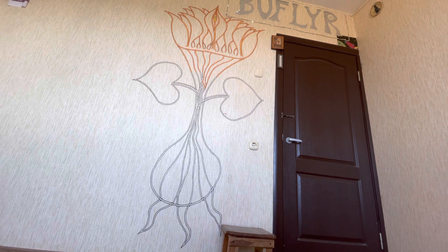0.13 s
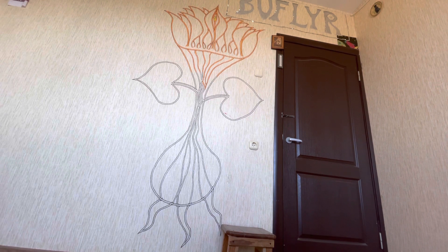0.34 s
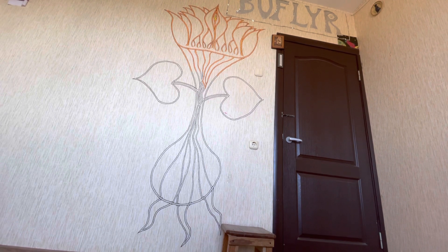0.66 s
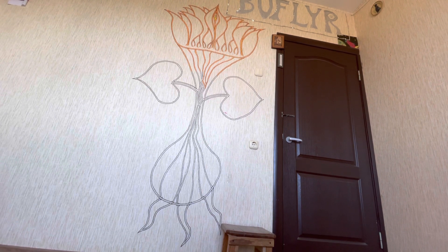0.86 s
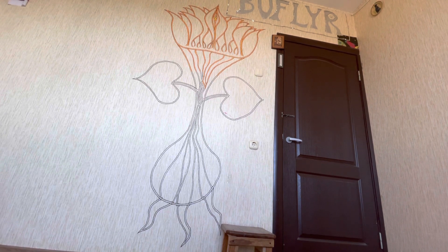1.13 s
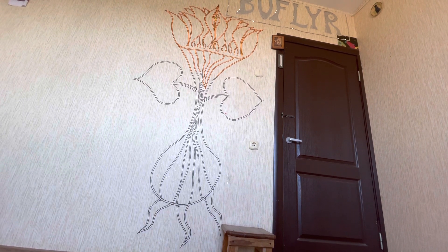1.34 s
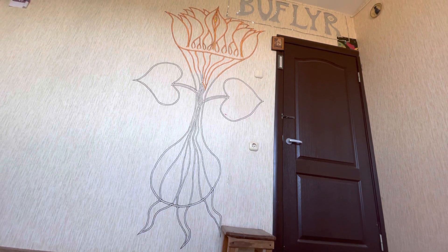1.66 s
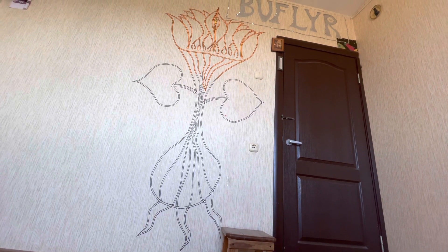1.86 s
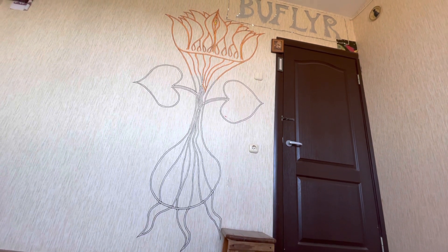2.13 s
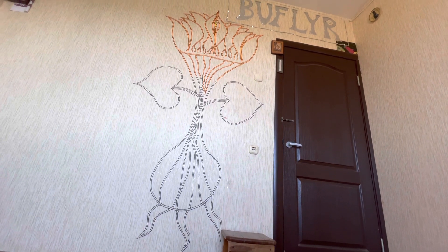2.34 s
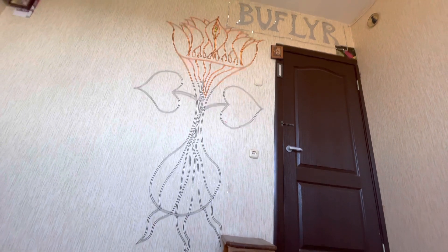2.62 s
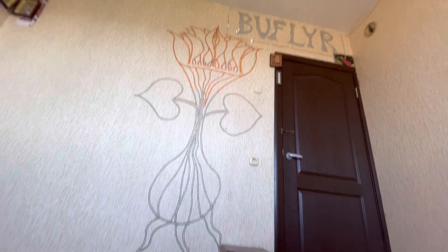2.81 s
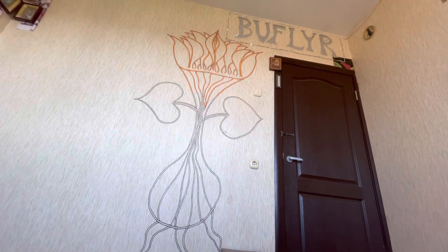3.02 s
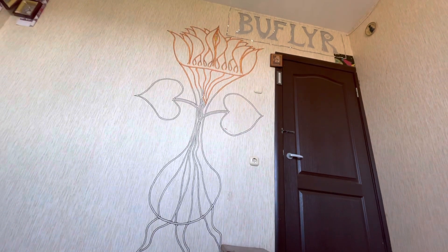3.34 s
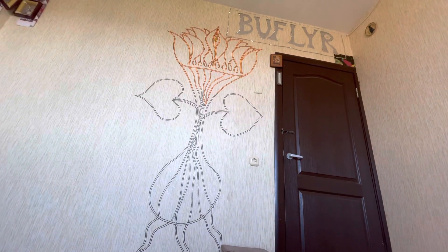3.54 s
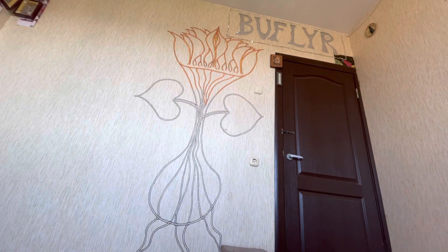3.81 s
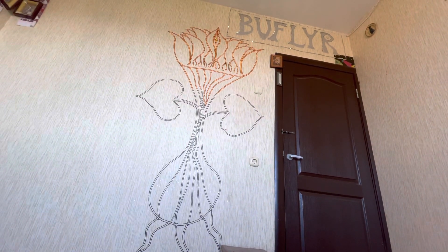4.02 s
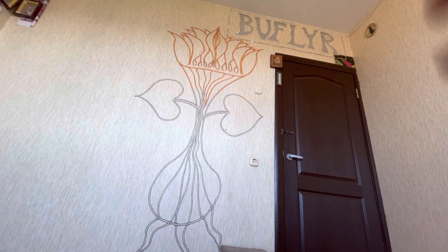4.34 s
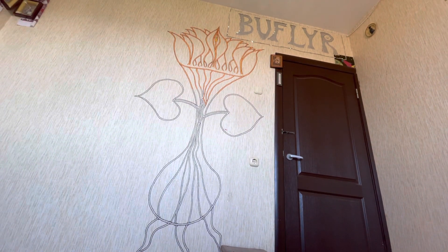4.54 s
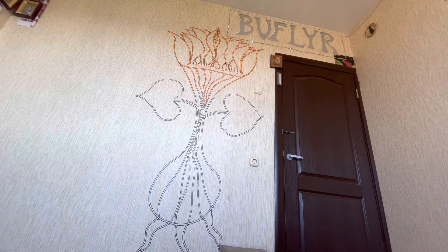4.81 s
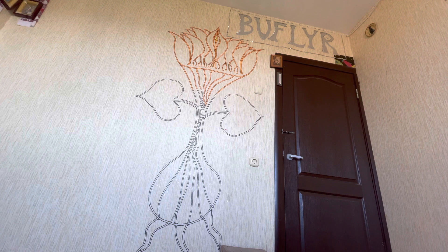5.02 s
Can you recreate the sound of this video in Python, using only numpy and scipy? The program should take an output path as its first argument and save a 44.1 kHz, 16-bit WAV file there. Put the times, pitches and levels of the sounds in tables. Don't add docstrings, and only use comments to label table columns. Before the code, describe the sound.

A quiet stereo phone capture of morning birds heard from a room. From 0 to 1 second, distant birds twitter in short level notes and quick falling chirps around 2.5-4 kHz, with a dense swell near 0.95. From 1.03 to 1.5 seconds a near bird shakes a fast, piercing trill around 8 kHz. A rough two-voiced buzz follows at 1.57-1.68, then throbbing, bent chirps near 3-5 kHz until 2.1, with other birds crowding behind around 1.75. Clear whistles fall at 2.24 and dip at 2.32-2.45, trailing faintly to 2.6. Afterward it is sparse: soft far glides, a thin high peep at 2.65-3.1, a cascade of descending sweeps at 3.44-3.9, and small calls around 4-5. Soft echo blurs the birds. Close finger ticks, a knock at 1.6, and gritty skin rubs, mostly 1.5-3 and 3.7, punctuate faint traffic hum and gently fading hiss.

```python
import sys
import numpy as np
from scipy import signal
from scipy.fft import rfft, irfft, next_fast_len
from scipy.io import wavfile
from scipy.ndimage import uniform_filter1d, map_coordinates

SR = 44100
rng = np.random.default_rng(int(sys.argv[2]) if len(sys.argv) > 2 else 0)


def voltage_ratio(level):
    return 10 ** (np.asarray(level, float) / 20)


def put_to_file(sound):
    columns = np.atleast_2d(sound).T
    safe = np.clip(columns, -1, 1)
    whole_steps = np.round(safe * 32767)
    wavfile.write(sys.argv[1], SR, whole_steps.astype(np.int16))


N = 227908


def unit(x):
    return x / np.sqrt(np.mean(x ** 2) + 1e-20)


def along(points, hz):
    f, v = np.transpose(points)
    return np.interp(np.log(hz + 1), np.log(f + 1), v)


def wobble(rate_hz, size=N):
    knots = rng.standard_normal(int(size * rate_hz / SR) + 4)
    return map_coordinates(knots, [np.arange(size) * rate_hz / SR])


def filtered(x, response):
    m = next_fast_len(N + SR // 2)
    return irfft(rfft(x, m) * response(np.fft.rfftfreq(m, 1 / SR)), m)[..., :N]


# freq_hz, correlation
LIKENESS = [(40, 0.71), (150, 0.21), (600, 0.5214), (1500, 0.8085), (9000, 0.18), (14000, 0.97)]


def rush(spectrum, patchy_db):
    z = signal.stft(rng.standard_normal((2, N)), nperseg=512)[2]
    field = uniform_filter1d(rng.standard_normal(z.shape[1:]), 6, 0)
    field = uniform_filter1d(field, 10, 1)
    pair = signal.istft(z * voltage_ratio(patchy_db * unit(field)), nperseg=512)[1][:, :N]

    def mid_side(hz):
        angle = np.arccos(np.clip(along(LIKENESS, hz), -1, 1)) / 2
        return voltage_ratio(along(spectrum, hz)) * [np.cos(angle), np.sin(angle)]

    mid, side = filtered(pair, mid_side)
    return unit(np.array([mid + side, mid - side]))


def add_voice(track, start_s, hz, gain):
    phase = 2 * np.pi * np.cumsum(hz) / SR
    start = max(round(start_s * SR), 0)
    track[start:][:len(hz)] += gain * (np.sin(phase) + voltage_ratio(-52) * np.sin(2 * phase))


def glides(rows, done):
    return [(s, length, a, a + done * (b - a), b, db) for s, length, a, b, db in rows]


def sing(rows, flutter_db, jitter, throb=0):
    pulse_hz = 165
    song = np.zeros(N + SR)
    for start_s, length_s, start_hz, middle_hz, end_hz, db in rows:
        u = np.linspace(0, 1, round(length_s * SR))
        hz = 2 * (u - .5) * (u - 1) * start_hz - 4 * u * (u - 1) * middle_hz + 2 * u * (u - .5) * end_hz
        level = voltage_ratio(db + flutter_db * wobble(260, size=len(u)))
        pulses = 1 - throb * np.cos(np.pi * pulse_hz * length_s * u) ** 2
        swell = np.sin(np.pi * u ** .9) ** .6
        shaky_hz = hz * (1 + jitter * wobble(300, size=len(u)))
        add_voice(song, start_s, shaky_hz, pulses * level * swell)
    return song[:N]


def calls(tables, rate_hz, flutter_db, uneven):
    song = np.zeros(N + SR)
    for rows in tables:
        s, hz, db, *swing = np.transpose(rows)
        t = np.arange(s[0], s[-1], 1 / SR)
        beat = 2 * np.pi * rate_hz * (t - s[0]) + uneven * wobble(90, size=len(t))
        pitch = np.interp(t, s, hz)
        if swing:
            pitch = pitch + np.interp(t, s, swing[0]) * np.sin(beat)
        edge = np.clip(np.minimum(t - s[0], s[-1] - t) / .005, 0, 1)
        level_db = np.interp(t, s, db) + flutter_db * wobble(rate_hz * 2.9, size=len(t))
        add_voice(song, s[0], pitch, edge * voltage_ratio(level_db))
    return song[:N]


# start_s, length_s, pitch_hz, peak_db
HELD = [(0.021, 0.0324, 2518, -43.5), (0.0, 0.0071, 3868, -54), (0.42, 0.012, 2980, -63),
        (0.436, 0.064, 3055, -65.5), (0.138, 0.069, 2969, -52.5), (0.306, 0.09, 2623, -53.5),
        (0.308, 0.0585, 3660, -70), (0.381, 0.0282, 3032, -59.5), (0.47, 0.051, 3840, -66.5),
        (0.719, 0.0712, 2979, -50.5), (0.75, 0.028, 3619, -52), (0.948, 0.1564, 2721, -50.5),
        (2.594, 0.046, 2486, -56), (3.977, 0.057, 3282, -78.5), (4.477, 0.0332, 3513, -75.5),
        (4.484, 0.061, 6167, -69), (4.517, 0.026, 5560, -69), (4.792, 0.0366, 3753, -68),
        (4.858, 0.16, 2950, -78.5), (0.203, 0.036, 3000, -59.5), (.005, 0.0164, 3320, -63),
        (1.19, 0.066, 2927, -72), (2.421, 0.032, 4416, -64.5), (2.25, .1, 7680, -82),
        (4.558, 0.0443, 3600, -69.5), (4.622, 0.0208, 3440, -66.5), (4.69, 0.0355, 3347, -68)]
# start_s, length_s, start_hz, end_hz, peak_db
HOOKS = [(.056, 0.0583, 3750, 3232, -56), (.145, 0.019, 4980, 4054, -61), (.553, 0.039, 3750, 3323, -54),
         (.62, 0.029, 3350, 3223, -59.5), (.887, 0.033, 3590, 3288, -64), (2.549, .056, 3280, 2518, -62),
         (3.971, 0.019, 6900, 5460, -57.5), (3.965, 0.037, 5800, 5432, -71),
         (4.217, 0.035, 6510, 4380, -73), (4.474, 0.02043, 6300, 5499, -65.5),
         (4.515, 0.022, 3929, 3370, -59)]
DROPS = [
    (2.395, 0.062, 5206, 4816, -68),
    (3.078, 0.054, 2680, 2346, -56),
    (3.302, 0.00954, 5108, 3001, -58.5),
    (3.408, 0.011, 5850, 4000, -73),
    (3.786, 0.02, 3900, 3371, -63.5),
    (4.694, 0.038, 4990, 3975, -71.5),
    (4.72, 0.035, 4680, 4180, -68.5),
    (4.755, 0.0249, 4118, 3299, -63),
    (5.051, 0.026, 4964, 4405, -73.5),
    (4.957, 0.024, 6736, 3800, -71),
]
SLUMPS = [(.11, 0.024, 3300, 2833, -46.5), (1.517, 0.0716, 4330, 3836, -67.5),
          (2.735, 0.0272, 3750, 2925, -68.5), (3.433, 0.0576, 3927, 3126, -61),
          (3.988, 0.02326, 5300, 4257, -56.5), (4.015, 0.0167, 3800, 3430, -59.5),
          (3.984, 0.022, 6700, 5690, -64.5), (4.005, 0.04, 5700, 5325, -66.5),
          (4.235, 0.057, 4300, 3196, -62.5), (4.495, 0.0226, 5640, 4413, -65),
          (4.975, 0.058, 3656, 3038, -60)]
RISES = [(4.738, 0.026, 8900, 11000, -73.5), (0.2683, 0.042, 2420, 2472, -42.5),
         (0.865, 0.014, 3350, 4200, -65), (.961, 0.0054, 3360, 4650, -78.5),
         (1.1166, 0.049, 2642, 2980, -55), (1.301, 0.044, 3914, 4152, -72),
         (2.3906, 0.09, 2693, 2787, -62.5), (2.7604, 0.077, 2991.2, 3052.4, -60.5),
         (2.964, 0.043, 2780, 3670, -66), (3.741, 0.047, 4560, 4396, -61.5),
         (3.1336, 0.015, 3187, 4160, -59.5), (3.151, 0.0096, 4128, 4632, -63),
         (3.2715, 0.04, 3360, 5202, -66.5), (3.265, 0.08, 2580, 3600, -69)]
# start_s, peak_db
CHIPS = [
    (.047, -62),
    (0.84, -54),
    (0.943, -51),
]
# start_s, peak_db
CASCADE = [
    (3.437, -65),
    (3.504, -65),
    (3.577, -62),
    (3.658, -57),
    (3.74, -57.5),
    (3.846, -58.5),
]


def far_notes():
    held = [(s, length, hz, hz, db) for s, length, hz, db in HELD]
    chips = [(s, .022, 4950, 3450, db) for s, db in CHIPS]
    top_hz, end_hz, top_sinks_hz_per_s = 7610, 4741, 3500
    sweep_s, sweep_grows_s_per_s = .03, .05
    cascade = []
    for s, db in CASCADE:
        late_s = s - CASCADE[0][0]
        length_s = sweep_s + sweep_grows_s_per_s * late_s
        cascade.append((s, length_s, top_hz - top_sinks_hz_per_s * late_s, end_hz, db))
    rows = glides(held + RISES, done=.48) + glides(cascade, done=.55) + glides(HOOKS, done=.9)
    rows += glides(DROPS + chips, done=.65) + glides(SLUMPS, done=.27)
    return sing(rows, flutter_db=2.5, jitter=.007)


# time_s, level_db
CHORUS = [(0.0, -52), (.1, -50), (.2, -58), (.3, -65), (0.55, -54.5), (.75, -51), (0.95, -39.5), (1.1, -71),
          (1.25, -85), (1.38, -63.5), (1.448, -78), (1.55, -81), (1.75, -41), (2.099, -51.5), (2.37, -84),
          (2.76, -77.5), (4.4, -81), (5.16, -70)]


def chorus():
    d = rng.random((700, 5))
    start_s, length_s = d[:, 0] * N / SR, .02 + .03 * d[:, 2]
    hz = 2600 * 1.55 ** d[:, 1]
    start_hz = hz * (1 + .3 * d[:, 3] ** 2)
    rows = np.transpose([start_s, length_s, start_hz, hz, 0.87 * hz, 6 * d[:, 4]])
    s, db = np.transpose(CHORUS)
    level = voltage_ratio(np.interp(np.arange(N) / SR, s, db) - 10.0)
    return level * unit(sing(rows, flutter_db=12, jitter=0.01))


# time_s, centre_hz, level_db, swing_hz
CHATTER = [
    [(0.0, 6168, -69.5, 747), (0.182, 6366, -91.5, 720), (0.2, 6600, -102, 750)],
    [(1.203, 5940, -71.5, 498.7), (1.215, 5940, -62.5, 399.8), (1.245, 6180, -84, 600),
     (1.27, 6360, -70, 600)],
    [(1.208, 4860, -71, 248), (1.235, 4830, -83, 247)],
    [(1.29, 6730, -53, 714), (1.296, 7156, -82.5, 744), (1.41, 6280, -68, 821)],
]


def chatter():
    return voltage_ratio(3) * calls(CHATTER, rate_hz=110, flutter_db=5, uneven=1.5)


# peak_s, rise_s, fall_s, level_db
PASSES = [
    (0.668, 0.038, 0.092, -59.5),
    (0.95, 0.096, 0.13, -68.5),
    (1.409, 0.25, 0.46, -71.5),
    (1.898, 0.3, 0.92, -64),
    (2.74, 0.07, 0.069, -74),
    (2.932, 0.034, 0.41, -63),
    (3.74, 0.021, 0.16, -66.5),
]
# freq_hz, level_db_per_hz
TRAFFIC = [(15, -58.5), (28, -8.5), (45, 0), (87, 3.5), (134, -4), (166, -3), (209, -35), (520, -51),
           (880, -120)]
# freq_hz, level_db_per_hz
AIR = [(120, -28.5), (200, -5), (420, -6), (750, -13), (1340, -13.5), (1700, -13.5), (3500, -25),
       (5500, -22), (7500, -27), (8900, -24.5), (9700, -28.5), (10400, -39.5), (14500, -44), (16000, -58)]


def town():
    t = np.arange(N) / SR
    passes = 0
    for s, rise_s, fall_s, db in PASSES:
        passes = passes + voltage_ratio(db) * np.exp(-((t - s) / np.where(t < s, rise_s, fall_s)) ** 2)
    level = np.hypot(voltage_ratio(-70 - 0.73 * t), passes)
    hum = level * voltage_ratio(1.5 * wobble(9)) * rush(TRAFFIC, patchy_db=2)
    return hum + voltage_ratio(-70 - 1.038 * t) * rush(AIR, patchy_db=0.5)


def strokes(rows):
    t = np.arange(N) / SR
    return sum(voltage_ratio(db) * np.exp(-((t - s) / half_s) ** 2) for s, half_s, db in rows)


# centre_s, half_length_s, level_db
SCUFFS = [
    (.04, 0.0424, -77.5),
    (.15, 0.048, -82.5),
    (.27, 0.0316, -93.5),
    (.4, 0.0525, -78.5),
    (1.75, 0.096, -75.5),
    (5.02, 0.094, -78.5),
]
RUBS = [(1.54, 0.022, -56.5), (1.8, 0.039, -63.5), (1.9, 0.031, -58), (1.97, 0.042, -56),
        (2.05, 0.02, -67.5), (2.65, 0.07, -72), (2.8, 0.041, -58.5), (2.92, 0.0286, -66.5),
        (3.0, 0.036, -75), (3.26, 0.024, -74), (3.715, 0.024, -59), (3.76, 0.0212, -59.5)]
SWISHES = [
    (1.95, .03, -76),
    (4.685, .024, -76),
    (4.862, .024, -78),
    (5.05, .04, -88),
    (5.15, .03, -88),
]
# freq_hz, level_db_per_hz
SCUFF = [(4500, -38), (6000, 6.5), (7600, -16.5), (8600, 0), (9400, -1.5), (10200, -8.5), (10600, -54)]
GRIT = [(59, -38.5), (100, -1.5), (921, -6.5), (1250, -7), (2440, -13), (2960, -20), (3730, -14),
        (9700, -29), (12600, -63), (21300, -120)]
SWISH = [(5000, -32.5), (9000, -6.5), (10500, -16.5), (13800, -8.5), (15300, -2.5), (16000, -71)]


def hand():
    grains = voltage_ratio(3.5 * wobble(200))
    rubs = strokes(RUBS) * unit(grains * rush(GRIT, patchy_db=4.5))
    scuffs = strokes(SCUFFS) * rush(SCUFF, patchy_db=3)
    return rubs + scuffs + strokes(SWISHES) * rush(SWISH, patchy_db=1)


# freq_hz, width_hz
CASE = [(1482, 430), (2315, 1633), (6360, 780), (8900, 1400), (600, 2100)]
# start_s, peak_db
SNAPS = [(.149, -60), (.168, -72), (.182, -67.5), (.198, -74.5), (.3513, -60.5), (1.036, -54.5),
         (1.3983, -67), (2.63, -67), (.121, -76), (.42, -72), (1.222, -69)]
CLICKS = [(.3361, -56), (.3865, -60), (.5161, -62.5), (1.7554, -65.5), (1.7683, -58), (2.0456, -57),
          (2.6304, -61), (2.9153, -55), (4.4004, -63.5), (4.5423, -55), (4.9561, -60.5), (.2, -72)]
PINGS = [(.2762, -61), (.2974, -58), (.446, -55.5), (1.035, -48), (1.4975, -48), (1.8648, -55),
         (1.969, -56), (1.9863, -51), (2.9068, -62.5), (4.5342, -64), (.645, -60.5), (.7885, -54),
         (4.4, -79), (4.543, -88), (4.955, -70), (1.51, -61.5)]
SPITS = [
    (.363, -52),
    (.448, -65),
    (1.7, -63),
    (1.9574, -60),
    (3.8844, -68),
    (3.805, -76),
    (2.41, -68),
    (4.02, -74),
]
LOW_CLICKS = [
    (1.51, -60),
    (1.5521, -64.5),
    (2.62, -62),
    (2.7793, -55),
    (3.7111, -69.5),
]
KNOCKS = [
    (1.5366, -50),
    (1.615, -43.5),
    (3.701, -76),
]
SNAP = (-9.5, 2, 0, -4, -35)
CLICK = (2.5, -1, -26.5, -25, -26.5)
PING = (-6, 7.5, -26.5, -24, -27)
SPIT = (-19, -12.5, -3, 3.5, -32)
LOW_CLICK = (-2.5, -28, -15.5, -23.5, -25)
KNOCK = (-27.5, -18, -22.5, -27.5, -2.5)


def ticks():
    kinds = [(CLICKS, CLICK), (LOW_CLICKS, LOW_CLICK), (PINGS, PING),
             (SNAPS, SNAP), (SPITS, SPIT), (KNOCKS, KNOCK)]
    blows = np.zeros((len(CASE), N))
    for rows, strike_db in kinds:
        s, db = np.transpose(rows)
        scatter_db = 2 * rng.standard_normal((len(s), len(CASE))).T
        blows[:, np.round(s * SR).astype(int)] = voltage_ratio(np.add.outer(strike_db, db) + scatter_db)
    c, w = np.transpose(CASE)[:, :, None]

    def modes(f):
        resonance = (1j * f * w / (c * c - f * f + 1j * f * w)) ** 3
        return resonance * SR / w * voltage_ratio(4) / (1 + (f / 10300) ** 40)

    return filtered(blows, modes).sum(axis=0)


# time_s, centre_hz, level_db, swing_hz
TRILL = [
    [(1.03, 8255, -52, 102.7), (1.09, 8384, -47.5, 181.2), (1.125, 8156, -47, 150.9),
     (1.15, 7980, -43.5, 94.5)],
    [(1.205, 8000, -57.5, 185.5), (1.222, 8039, -41, 194), (1.319, 8099, -40.5, 206.4),
     (1.402, 7913, -41.5, 150)],
    [(1.255, 7400, -53, 30.98), (1.275, 7614, -63, 30.2), (1.29, 7215, -41, 29.77)],
    [(1.375, 8900, -71.5, 59.03), (1.4, 8558, -76, 60), (1.425, 8674, -68.5, 58.8)],
    [(1.41, 8310, -53, 149.4), (1.469, 7928, -43, 151.4), (1.5, 8576, -72, 152.8)],
]


def trill():
    return calls(TRILL, rate_hz=91, flutter_db=5.5, uneven=1.8)


# time_s, centre_hz, level_db, swing_hz
BUZZ = [
    [(1.57, 3744, -46, 250), (1.585, 3463, -45, 296), (1.615, 3650, -41.5, 248), (1.635, 3459, -51.5, 250),
     (1.655, 3490, -53, 303), (1.683, 3352, -53.5, 306)],
    [(1.568, 4745, -52.5, 148.7), (1.582, 4324, -49.5, 251), (1.598, 4248, -41.5, 248),
     (1.615, 4193, -46, 244), (1.64, 4154, -54, 198), (1.65, 4476, -49, 201), (1.683, 4056, -47, 203)],
]


def buzz():
    return calls(BUZZ, rate_hz=140, flutter_db=5, uneven=2.5)


# start_s, length_s, start_hz, middle_hz, end_hz
ARCHES = [(1.688, 0.0188, 3288, 3942, 4516), (1.699, 0.0192, 3769, 3740, 3892),
          (1.707, 0.019, 4403, 4256, 3000), (1.746, 0.015, 3400, 3825, 3838),
          (1.762, 0.01925, 4499, 3907, 3300), (1.769, 0.0169, 4000, 4356, 4437),
          (1.804, .026, 3321, 3709, 3750), (1.867, 0.027, 3453, 3833, 3687),
          (1.943, 0.024, 4042, 4316, 4200), (1.951, 0.022, 3441, 3513, 2962),
          (2.019, 0.012, 3696, 3415, 3210), (2.023, 0.018, 4200, 4344, 4304)]
ARCH_LEVELS = [-37, -42, -39, -36, -35.5, -46, -35.5, -36.5, -42.5, -42, -43, -44.5]
# start_s, length_s, start_hz, end_hz, peak_db
STROKES = [
    (1.812, 0.036, 5000, 5050, -57),
    (1.827, .026, 4600, 2950, -39),
    (1.876, 0.028, 4976, 5250, -55),
    (1.89, .02, 4600, 2900, -40),
    (2.088, 0.014, 3200, 4250, -44),
    (2.1, .02, 4500, 4840, -57),
    (1.783, .014, 4900, 5050, -56),
]


def chirps():
    arches = [(*row, db) for row, db in zip(ARCHES, ARCH_LEVELS)]
    rows = arches + glides(STROKES, done=.65)
    return voltage_ratio(4.0) * sing(rows, flutter_db=2, jitter=.018, throb=.7)


# start_s, length_s, start_hz, end_hz, peak_db
CLEAR = [
    (2.148, 0.015, 3639, 3873, -35),
    (2.161, .02, 3292, 4953, -38.5),
]
# time_s, pitch_hz, level_db
WHISTLES = [
    [(2.238, 4520, -45), (2.262, 4380, -39), (2.271, 4330, -31), (2.277, 4300, -40), (2.282, 4260, -33),
     (2.292, 4260, -60)],
    [(2.316, 3666, -40), (2.335, 3650, -34), (2.35, 3588, -30), (2.358, 3572, -35), (2.366, 3541, -30),
     (2.39, 3510, -33.5), (2.399, 3550, -30), (2.411, 3620, -32), (2.448, 3600, -48)],
    [(2.458, 3661, -83.5), (2.473, 3797, -50.5), (2.55, 3657, -60.5)],
    [(2.51, 4148, -65.5), (2.552, 4294, -44.5), (2.6, 3908, -80.5)],
]


def whistles():
    clear = sing(glides(CLEAR, done=.48), flutter_db=1.5, jitter=.004)
    return calls(WHISTLES, rate_hz=30, flutter_db=.8, uneven=0) + clear


def near_bird():
    return trill() + buzz() + chirps() + whistles()


# time_s, pitch_hz, level_db
PEEPS = [
    [(2.44, 8006, -91), (2.484, 7940, -79), (2.6, 7640, -99)],
    [(2.65, 8250, -86), (3.07, 8171, -80), (3.13, 8200, -99)],
]


def peeps():
    return calls(PEEPS, rate_hz=29, flutter_db=9.0, uneven=0)


def echoes(x, t60, alike, count=3):
    hz, t, z = signal.stft(rng.standard_normal((count, 3, SR)), SR, nperseg=256)
    tails = signal.istft(z * voltage_ratio(-60 * t / along(t60, hz)[:, None]), SR, nperseg=256)[1]
    share = np.clip(alike, 0, 1)
    pair = np.sqrt(share) * tails[:, :1] + np.sqrt(1 - share) * tails[:, 1:]
    offsets = np.arange(count)[:, None] / count
    turns = np.cos(np.pi * (22 * np.arange(N) / SR + offsets)) ** 2
    parts = np.pad(x * turns, ((0, 0), (130, 0)))[:, None]
    return signal.fftconvolve(parts, pair / np.linalg.norm(pair[0, 0]), axes=2).sum(axis=0)[:, :N]


# freq_hz, t60_s
ROOM = [(1000, 0.087), (3500, 0.084), (9000, 0.27)]
TREES = [(2000, .17), (3500, 0.2), (4900, 0.19), (6000, 0.18), (8000, 0.23)]
YARD = [(1000, 0.15), (3500, 0.478), (9000, 0.033)]
HAND = [(500, 0.05), (2000, 0.05), (9000, 0.04)]
# freq_hz, gain_db
WINDOW = [(2400, -14.5), (3000, 1), (3550, 7.5), (3950, -0.5), (4330, 2), (4800, 11), (6000, -1.5),
          (6900, 5), (7600, -1.5)]


def scene():
    near, far, case = near_bird(), far_notes() + peeps(), ticks()
    crowd = chorus() + chatter()
    song = near + voltage_ratio(-5) * echoes(near, ROOM, alike=0.77)
    far += voltage_ratio(-12) * np.roll(far, round(.012 * SR))
    song += voltage_ratio(-3) * far + voltage_ratio(-3.5) * echoes(far, TREES, alike=0.52)
    song += voltage_ratio(-2) * crowd + echoes(voltage_ratio(-4.5) * crowd, TREES, alike=0.32)
    song += echoes(voltage_ratio(-17) * near + voltage_ratio(-16) * far + voltage_ratio(-11.5) * crowd, YARD, alike=0.6)
    song = filtered(song, lambda hz: voltage_ratio(along(WINDOW, hz)))
    case = case + voltage_ratio(-7) * echoes(case, HAND, alike=0.88, count=1)
    return song + case + hand() + town()


# freq_hz, lead_rad
LEAD = [(30, -2), (150, -.9), (600, -3.3), (1290, -1.8), (1640, -3.0), (2330, -3.9), (2670, -5.7),
        (3450, -8.2), (4390, -7.4), (4820, -10.2), (6290, -14.5), (7060, -12.9), (8200, -13.8),
        (9470, -21.8), (11500, -25.6)]
# freq_hz, gain_db
TILT = [(30, 3), (200, 2.4), (400, .4), (9000, .3)]


def two_ports(dry):
    side = np.array([[.5], [-.5]])
    return filtered(dry, lambda hz: voltage_ratio(side * along(TILT, hz)) * np.exp(1j * side * along(LEAD, hz)))


def band(x, low_hz, high_hz):
    return filtered(x, lambda hz: (hz > low_hz) & (hz < high_hz))


def thin_above(ports, loud_hz, weak_hz, gap_db, hold):
    loud, weak = band(ports, *loud_hz), band(ports, *weak_hz)
    loud_power = uniform_filter1d(loud[0] ** 2, size=hold)
    weak_power = uniform_filter1d(weak[0] ** 2, size=hold)
    over = loud_power > voltage_ratio(gap_db) * weak_power + voltage_ratio(-102)
    return ports - .95 * uniform_filter1d(1. * over, size=600) * weak


def low_pass(x):
    return signal.sosfilt(signal.butter(12, 15800, fs=SR, output="sos"), x)


def record(dry):
    ports = two_ports(dry)
    ports = thin_above(ports, (7000, 9100), (9100, SR), gap_db=50, hold=2500)
    ports = thin_above(ports, (2800, 5300), (5500, 7300), gap_db=76, hold=1500)
    return low_pass(ports)


dry = scene()
out = record(dry)
put_to_file(out)
```